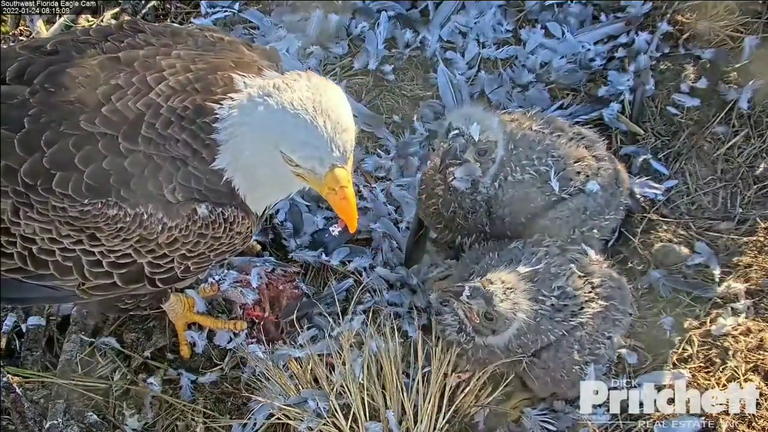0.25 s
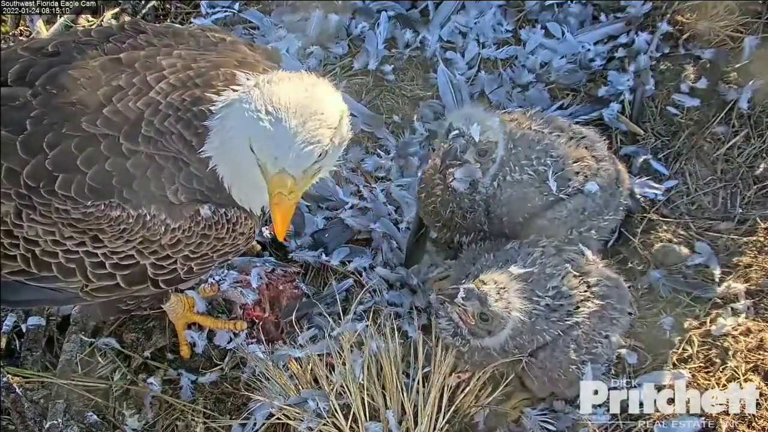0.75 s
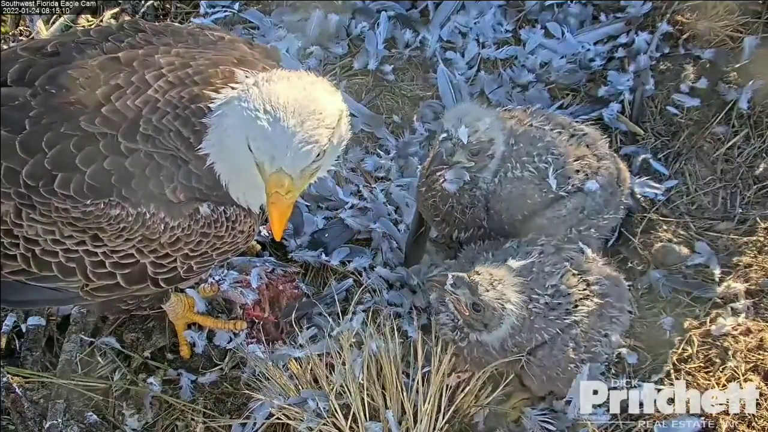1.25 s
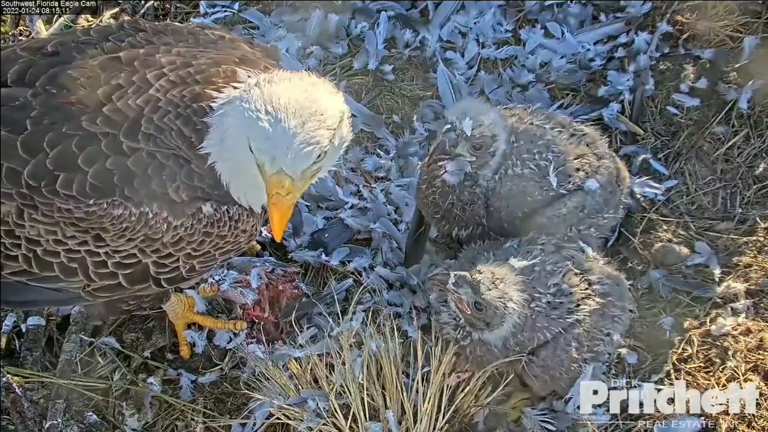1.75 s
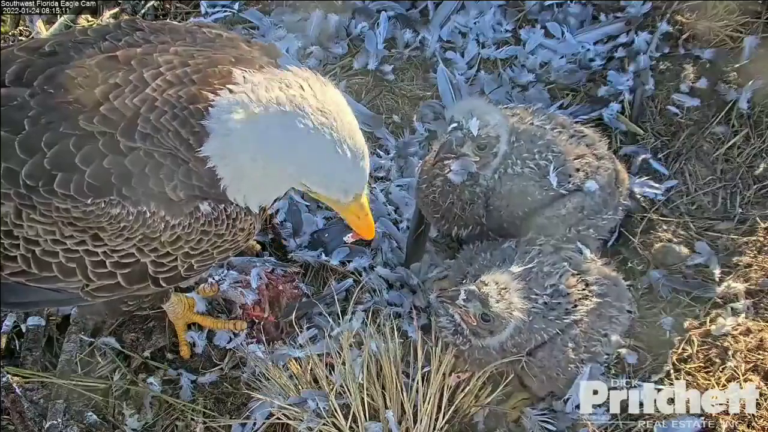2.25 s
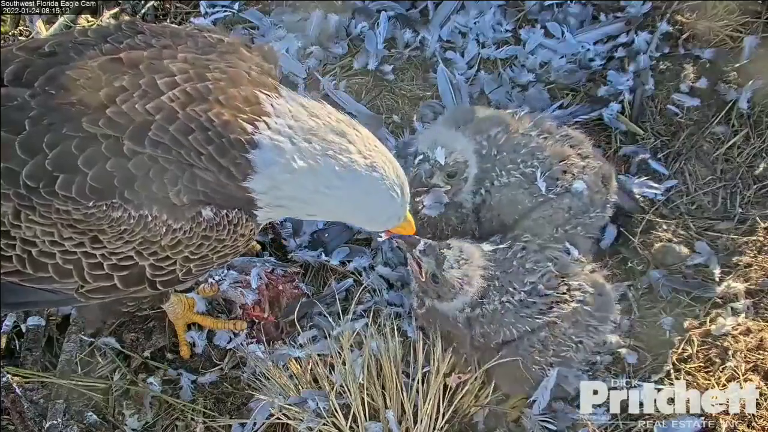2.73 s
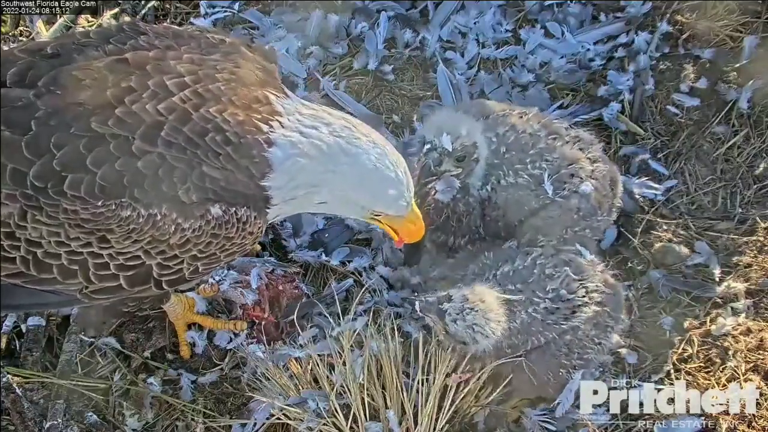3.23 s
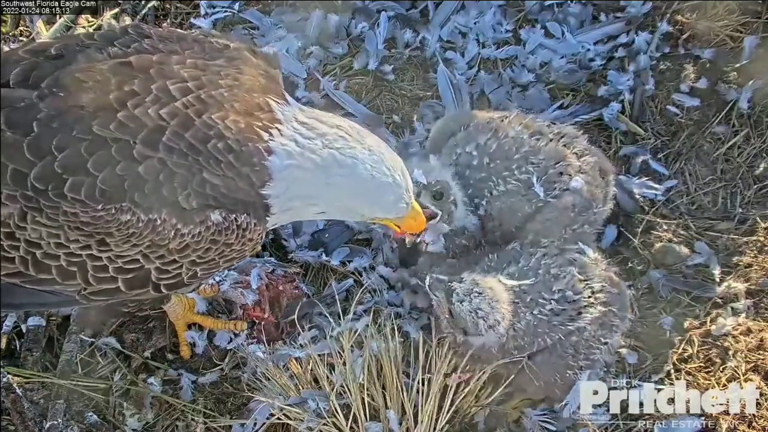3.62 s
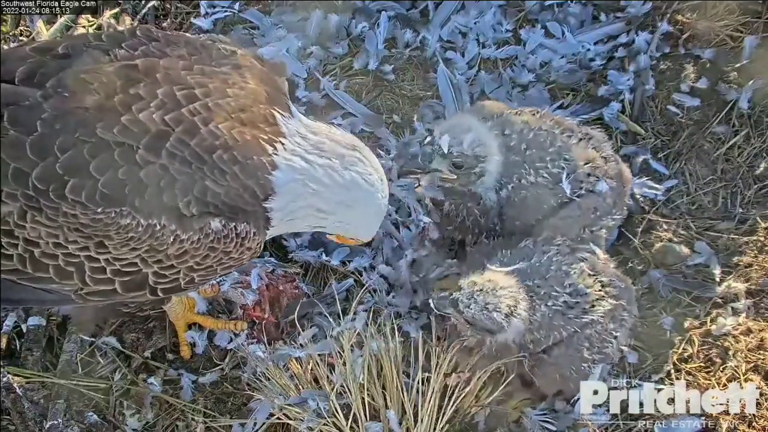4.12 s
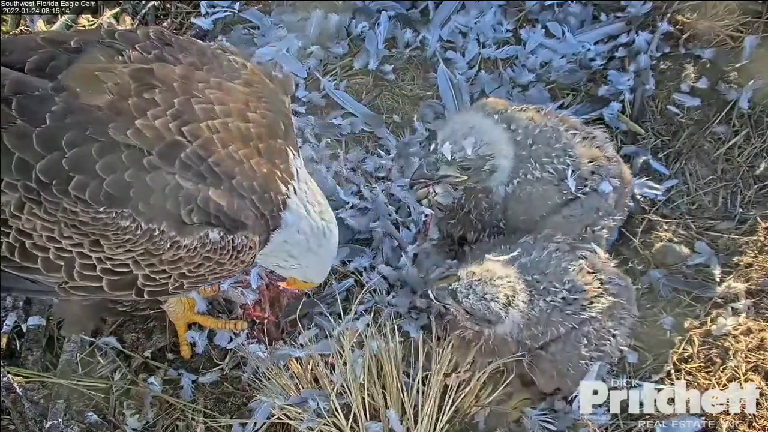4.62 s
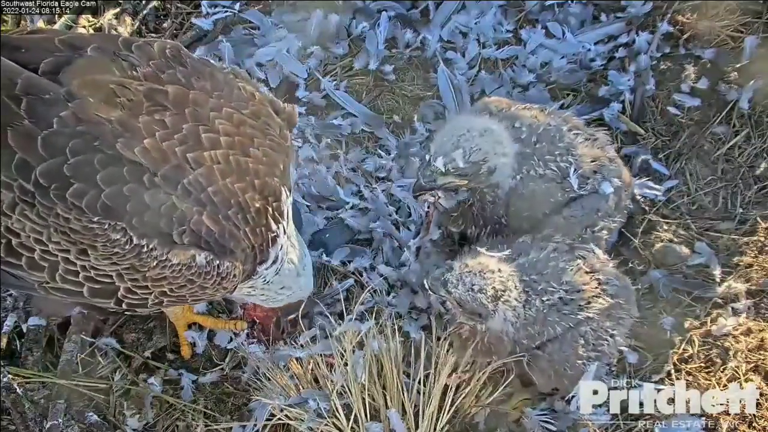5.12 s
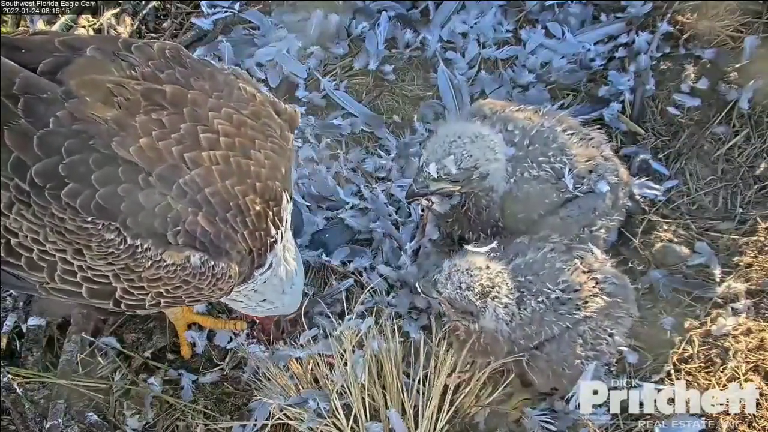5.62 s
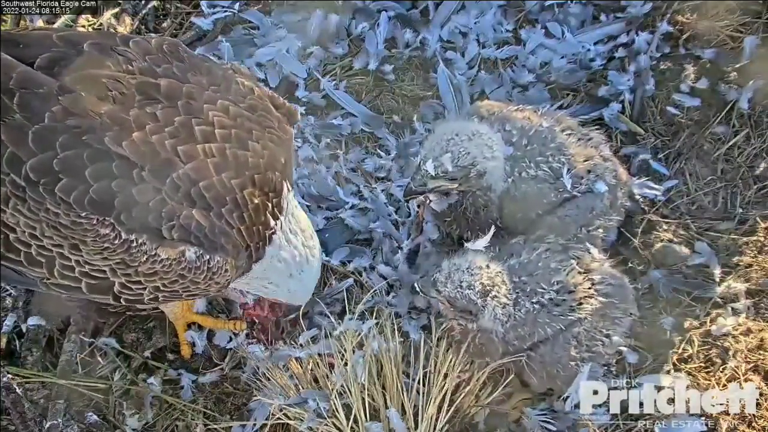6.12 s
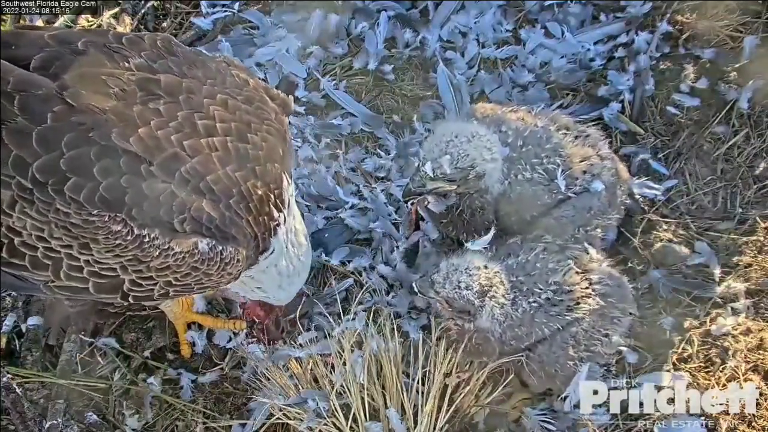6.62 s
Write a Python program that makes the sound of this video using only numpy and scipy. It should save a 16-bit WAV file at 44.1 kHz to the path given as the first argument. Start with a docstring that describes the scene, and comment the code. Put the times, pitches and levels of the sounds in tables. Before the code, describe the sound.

Deep overloaded wind buffeting over distant road hum, while two eaglets give weak high chirps and one brief buzz crackles midway.

```python
"""Wind on the capsule of a treetop-nest microphone: gusting deep noise that drives the input into clipping.
Buffets shake it for a few low cycles, and engines on a road far below add wavering firing notes. Tyre roar, a
shaped noise, comes through only between the flattened peaks; one hears a patchy treble with holes in it. So do
the thin whistles of two chicks, near-sines on pitch curves with an octave. Once the signal stutters in a short
buzz: six quick jumps towards the opposite side."""
import sys
import numpy as np
from scipy import signal
from scipy.fft import rfft, irfft, next_fast_len
from scipy.io import wavfile
from scipy.ndimage import uniform_filter1d

SR = 44100
rng = np.random.default_rng(int(sys.argv[2]) if len(sys.argv) > 2 else 0)


def unload_audio(sound):
    """Save the sound as a 16-bit wav file, at the path given as the first command line argument."""
    columns = np.transpose(np.atleast_2d(sound))
    # keep every value between -1 and 1, then stretch to whole-number steps
    steps = np.round(np.clip(columns, -1, 1) * 32767)
    wavfile.write(sys.argv[1], SR, steps.astype(np.int16))


def ratio_of_db(decibels):
    """Turn decibels (scalar or array-like) into linear amplitude factors; 0 dB maps to 1."""
    return 10 ** (np.asarray(decibels, float) / 20)


N = 302967  # length in samples


def rms_one(x):
    """Scale to unit rms."""
    return x / np.sqrt(np.mean(x ** 2) + 1e-20)


def in_time(rows):
    """Columns of a breakpoint curve, read at every sample."""
    s, *columns = np.transpose(rows)
    return [np.interp(np.arange(N) / SR, s, c) for c in columns]


def gate(rows, fade_s):
    """One while the curve lasts, with soft ends."""
    t = np.arange(N) / SR
    to_nearest_end = np.minimum(t - rows[0][0], rows[-1][0] - t)
    return np.clip(to_nearest_end / fade_s + .5, 0, 1) ** 2


def drift(rate_hz):
    """Slow random modulation with spread 1: noise through a two-pole low-pass, run at every 40th sample."""
    pole = np.exp(-80 * np.pi * rate_hz / SR)
    noise = rng.standard_normal(N // 40 + 2002)
    slow = signal.lfilter([1], [1, -2 * pole, pole * pole], noise)[2000:]
    return np.interp(np.arange(N) / 40, np.arange(len(slow)), rms_one(slow))


def coloured_noise(spectrum, peaks=()):
    """White noise shaped by a spectrum and bell-shaped resonances; rms 1."""
    size = next_fast_len(N)
    hz = np.arange(size // 2 + 1) * SR / size + 1e-3
    corner_hz, corner_db = np.transpose(spectrum)
    db = np.interp(np.log(hz), np.log(corner_hz), corner_db)
    for centre_hz, width_hz, top_db in peaks:
        db = db + top_db / (1 + (2 * (hz - centre_hz) / width_hz) ** 2)
    white = rfft(rng.standard_normal(size))
    return rms_one(irfft(white * ratio_of_db(db), size)[:N])


def tone(hz):
    """A sine of rms 1 on a pitch curve, from a random phase."""
    return np.sqrt(2) * np.sin(2 * np.pi * (np.cumsum(hz) / SR + rng.random()))


# gusts on the capsule: [peak t/s, peak level/dB, length/s]
GUST_PEAKS = [(0, -0.5, 0.16), (0.508, -10.5, .25), (1.163, -10, 0.22), (1.363, -6, .2),
              (2.035, -13.5, 0.23), (2.259, -8.5, .12), (2.774, -5.5, 0.14), (3.03, -7, 0.32),
              (3.59, -1, 0.22), (4.057, -5, 0.45), (4.41, -5.5, .12), (4.571, -4.5, 0.12),
              (4.889, -10.5, .1), (5.451, -9, .35), (6.222, -6.5, 0.12), (6.845, -2, 0.14)]
# colour of the wind, relative: [f/Hz, density level/dB]
WIND_COLOUR = [(5, -3), (12, -2), (30, 2.5), (60, -3.5), (90, -8), (130, -19.5), (220, -30), (400, -70.5),
               (1500, -110), (16000, -170)]
CALM_DB, GUST_RISE_SHARE = -14.5, 0.44  # wind between gusts; share of a gust's length spent rising


def wind(lumpy_db=1.5):
    """Eddies push on the capsule in lumps; each gust swells out of the calm and dies away."""
    t = np.arange(N) / SR
    power = np.full(N, ratio_of_db(CALM_DB) ** 2)
    for s, peak_db, length_s in GUST_PEAKS:
        side_s = length_s * np.where(t < s, GUST_RISE_SHARE, 1 - GUST_RISE_SHARE)
        power += ratio_of_db(peak_db) ** 2 * np.exp(-2 * np.abs(t - s) / side_s)
    lumps = ratio_of_db(lumpy_db * drift(6.0))
    return np.sqrt(power) * lumps * coloured_noise(WIND_COLOUR)


# the lasting engine note: [t/s, f/Hz, level/dB]
ENGINE_NOTE = [(0, 60.2, -13.5), (.55, 58.05, -12), (1, 58.02, -19), (1.5, 58.98, -12.5), (2, 59.19, -21),
               (2.5, 59.85, -15.5), (3.6, 60.3, -9), (4.2, 61.38, -7), (4.8, 62.53, -13.5),
               (5.5, 63.62, -9), (6.3, 63.93, -13), (6.87, 65.12, -16)]
# vehicles that come and go, gliding evenly in pitch: [start t/s, end t/s, first f/Hz, last f/Hz, level/dB]
VEHICLE_PASSES = [(0, 2.92, 77.1, 90.5, -20), (2.5, 3.92, 67, 78.92, -18), (2.5, 3.34, 109.6, 106.6, -23.5),
                  (4, 6.87, 73.35, 84.34, -14.5), (4.499, 7.1, 103, 98.5, -18.5)]


def engines(waver=.006, flutter_db=3.5):
    """Each far engine reaches the nest as its firing note, wavering on the way through moving air."""
    notes = [ENGINE_NOTE]
    for s, end_s, hz, end_hz, db in VEHICLE_PASSES:
        notes.append([(s, hz, db), (end_s, end_hz, db)])
    out = np.zeros(N)
    for rows in notes:
        hz, level_db = in_time(rows)
        note = tone(hz * (1 + waver * drift(3.0)))
        out += gate(rows, 0.38) * ratio_of_db(level_db + flutter_db * drift(3.7)) * note
    return out


# depth of the random holes in the spectrum: [f/Hz, spread level/dB before the cap]
HOLE_DEPTH = [(800, 1.5), (1900, 3.5), (2500, 7), (5000, 9.5), (9000, 7)]
HOLE_TOP = 0.47  # cap: rises stop at this many spreads, dips go deeper


def patchy_treble(sound):
    """Random gains on short narrow cells of the spectrum; one hears a treble with holes in it."""
    hz, _, cells = signal.stft(sound, SR, nperseg=1536)
    # random per cell, averaged over four neighbouring frequencies
    chance = rms_one(uniform_filter1d(rng.standard_normal(cells.shape), size=4, axis=0))
    spread_db = np.interp(hz, *np.transpose(HOLE_DEPTH))[:, None]
    gain = ratio_of_db(spread_db * np.minimum(chance, HOLE_TOP))
    gain /= np.sqrt(np.mean(gain ** 2, axis=1, keepdims=True))  # keeps the colour
    return rms_one(signal.istft(cells * gain, SR, nperseg=1536)[1][:N])


# tyre roar over time: [t/s, level/dB]
ROAR_LEVEL = [(0, -33), (.5, -34.5), (1.8, -31.5), (2.4, -33), (3.3, -30), (4.4, -30.5), (5.6, -29.5),
              (6.87, -31)]
# colour of the roar, relative: [f/Hz, density level/dB]
ROAR_COLOUR = [(120, -13), (250, -5), (500, -5.5), (800, -18), (1250, -17), (1900, -17.5), (2100, -21.5),
               (3000, -30.5), (3600, -31), (4300, -41), (5700, -42.5), (6300, -47), (9400, -49.5),
               (10200, -67), (16000, -64.5)]
# resonances of the microphone housing: [centre f/Hz, width/Hz, boost level/dB]
HOUSING_PEAKS = [(327.2, 62, 14.5), (689.6, 40, 12), (964, 190, 11), (1467, 75, 10.5), (1740, 130, 12.5),
                 (2594, 150, 4)]


def road(uneven_db=0.77):
    """Tyre roar is a broad noise, coloured by the housing and slightly uneven in level."""
    roar = patchy_treble(coloured_noise(ROAR_COLOUR, HOUSING_PEAKS))
    return ratio_of_db(in_time(ROAR_LEVEL)[0] + uneven_db * drift(8.8)) * roar


# one curve per whistle: [t/s, f/Hz, level/dB, octave level/dB]
WHISTLES = [
    [(0, 3980, -63, -72), (.06, 4040, -62, -74), (.09, 4070, -64, -80), (.13, 4020, -66, -85)],
    [(.005, 4270, -66, -85), (.035, 4290, -65, -82), (.06, 4340, -64, -70), (.078, 4380, -70, -80),
     (.1, 4490, -62, -76), (.115, 4600, -55, -66), (.13, 4630, -54, -63), (.155, 4640, -55, -62),
     (.172, 4600, -59, -66), (.19, 4700, -56, -66), (.203, 4810, -55, -68), (.225, 4720, -55, -65),
     (.238, 4700, -53, -67), (.257, 4880, -54, -78), (.285, 4860, -59, -90), (.305, 4860, -66, -90),
     (.325, 4800, -55, -72), (.34, 4620, -56, -74), (.352, 4250, -64, -90), (.365, 3800, -54, -74),
     (.378, 3480, -48, -62), (.39, 2950, -54, -85), (.398, 2560, -46, -64), (.414, 2470, -47, -75)],
    [(.125, 5200, -62, -95), (.16, 5150, -63, -95), (.185, 5140, -63, -95), (.205, 5150, -80, -95),
     (.235, 5200, -63, -95), (.265, 5330, -65, -95), (.285, 5300, -85, -95), (.315, 5200, -80, -95),
     (.328, 5150, -62, -95), (.342, 5150, -82, -95), (.38, 5220, -82, -95), (.398, 5180, -62, -95),
     (.43, 5150, -74, -95)],
    [(.36, 4680, -68, -95), (.41, 4650, -64, -95), (.45, 4620, -66, -95), (.51, 4615, -69, -95),
     (.545, 4580, -72, -95), (.575, 4545, -67, -95), (.6, 4600, -74, -95), (.72, 4600, -80, -95),
     (.75, 4605, -65, -95), (.775, 4600, -72, -95)],
    [(.62, 4220, -66, -95), (.645, 4200, -72, -95), (.665, 4165, -69, -95), (.69, 4230, -64, -95),
     (.72, 4180, -64, -95), (.74, 4200, -71, -95), (.77, 4240, -68, -95)],
    [(.785, 3150, -57, -85), (.805, 3390, -51, -78), (.82, 3450, -58, -74), (.845, 3510, -69, -88),
     (.882, 3560, -59, -85), (.9, 3480, -62, -85), (.928, 3330, -50, -80), (.95, 3230, -59, -85),
     (.962, 3050, -65, -90)],
    [(.811, 3085, -53, -63), (.831, 2760, -47, -63)],
    [(1.5, 3370, -58, -80), (1.515, 3370, -51, -70), (1.534, 3400, -46, -65), (1.552, 3310, -47, -66),
     (1.565, 3270, -49, -80), (1.582, 3300, -48, -85), (1.595, 3400, -57, -76), (1.61, 3490, -59, -67),
     (1.644, 3556, -53, -60), (1.674, 3620, -52, -66), (1.69, 3660, -55, -76), (1.702, 3730, -63, -78),
     (1.722, 3620, -57, -80)],
    [(4.57, 3340, -57, -85), (4.65, 3346, -55, -82), (4.67, 3370, -64, -85), (4.702, 3410, -55, -80),
     (4.74, 3500, -57, -71), (4.796, 3617, -55, -72), (4.825, 3620, -66, -85), (4.876, 3650, -51, -74),
     (4.895, 3690, -53, -68), (4.91, 3770, -63, -65), (4.94, 3865, -63, -65), (4.97, 4010, -61, -62),
     (5.005, 3980, -63, -69), (5.035, 4020, -60, -63), (5.06, 4070, -68, -80), (5.09, 4170, -71, -88),
     (5.12, 4270, -63, -88), (5.145, 4310, -65, -88), (5.17, 4280, -71, -88), (5.205, 4180, -64, -76),
     (5.228, 4000, -71, -80), (5.248, 3860, -66, -78), (5.266, 3670, -57, -75), (5.29, 3560, -72, -88)],
    [(5.385, 5650, -68, -90), (5.41, 5420, -66, -90), (5.43, 5050, -68, -90)],
    [(4.97, 5400, -74, -95), (5.04, 5520, -73, -95), (5.11, 5560, -69, -95), (5.17, 5640, -71, -95),
     (5.23, 5520, -73, -95)],
    [(5.26, 4880, -70, -95), (5.34, 4870, -73, -95), (5.4, 4880, -70, -95), (5.49, 4935, -70, -95)],
    [(5.32, 3280, -64, -88), (5.365, 3335, -58, -88), (5.385, 3600, -70, -85), (5.4, 3720, -63, -78),
     (5.45, 3765, -60, -78), (5.48, 3815, -58, -78), (5.51, 3750, -69, -80), (5.54, 3670, -62, -76),
     (5.57, 3750, -59, -76), (5.6, 3810, -55, -76), (5.635, 3805, -58, -82), (5.66, 3720, -63, -82),
     (5.695, 3755, -61, -88), (5.74, 3730, -65, -88)],
    [(6.01, 3270, -62, -80), (6.035, 3300, -59, -80), (6.062, 3340, -65, -80), (6.085, 3361, -55, -80),
     (6.12, 3385, -60, -76), (6.158, 3442, -54, -73), (6.19, 3490, -57, -85), (6.21, 3505, -66, -88),
     (6.27, 3530, -64, -85), (6.3, 3560, -52, -80), (6.33, 3590, -54, -78), (6.36, 3635, -52, -72),
     (6.388, 3670, -51, -68), (6.41, 3700, -64, -70), (6.44, 3690, -64, -72), (6.48, 3700, -74, -73),
     (6.512, 3765, -57, -67), (6.54, 3810, -60, -72), (6.555, 4000, -70, -80), (6.575, 4200, -63, -88),
     (6.6, 4300, -63, -90), (6.635, 4300, -66, -90), (6.665, 4310, -56, -86), (6.695, 4330, -66, -90),
     (6.71, 4420, -80, -90), (6.726, 4450, -58, -90), (6.742, 4450, -82, -95), (6.765, 4440, -78, -95),
     (6.783, 4440, -60, -90), (6.8, 4460, -66, -90)],
]
FIRM_DB = -55  # whistles softer than this flicker more
FLICKER_DB, FLICKER_GROWTH = 1.8, .13  # level spread when firm; extra dB of spread per dB below firm
GLIDE_ROUGHENS = 1.6  # extra pitch wobble as a share, per squared octave glided in 10 ms


def chicks(waver=.003):
    """Near-sine whistles with an octave; faint breath breaks up pitch and level, fast glides turn rough."""
    out = np.zeros(N)
    for rows in WHISTLES:
        hz, level_db, octave_db = in_time(rows)
        flicker_db = FLICKER_DB + FLICKER_GROWTH * np.maximum(FIRM_DB - level_db, 0)
        glide = np.abs(np.gradient(np.log2(hz))) * SR / 100  # octaves in 10 ms
        wobble = waver * flicker_db / FLICKER_DB + GLIDE_ROUGHENS * glide ** 2
        hz = hz * (1 + wobble * drift(80.0))
        breath = gate(rows, .02) * ratio_of_db(flicker_db * drift(32.0))
        out += breath * (ratio_of_db(level_db) * tone(hz) + ratio_of_db(octave_db) * tone(2 * hz))
    return out


# hard buffets, short bursts of the capsule's low flutter: [centre t/s, level/dB, length/s]
BUFFET_HITS = [(0.406, -12, 0.061), (0.552, -8, 0.05), (0.703, -8.5, 0.037), (1.443, -3.5, 0.058),
               (1.592, -7, .06), (2.542, -6.5, .07), (2.91, -1.5, 0.066), (3.048, -6.5, 0.064),
               (3.242, -4.5, 0.1), (3.509, -4, 0.055), (4.188, -8.5, 0.087), (4.349, -2.5, 0.083),
               (4.508, -4, 0.1), (4.836, -4.5, 0.13), (5.818, -3, 0.06), (6.213, -9.5, 0.05),
               (6.463, -4.5, 0.082)]
BUFFET_HZ, BUFFET_WIDTH_HZ = 54.52, 45


def buffets():
    """A hard eddy shakes the capsule unevenly for a few cycles, swelling and fading."""
    t, swell = np.arange(N) / SR, np.zeros(N)
    for s, level_db, length_s in BUFFET_HITS:
        swell += ratio_of_db(level_db) * np.exp(-(2 * (t - s) / length_s) ** 2)
    edges = [BUFFET_HZ - BUFFET_WIDTH_HZ / 2, BUFFET_HZ + BUFFET_WIDTH_HZ / 2]
    band = signal.butter(2, edges, "band", fs=SR, output="sos")
    shake = signal.sosfilt(band, rng.standard_normal(N))
    # evened to rms 1 over 2000 samples
    return swell * shake / np.sqrt(uniform_filter1d(shake ** 2, size=2000) + 1e-12)


OVERLOAD = .705  # clipping ceiling, full scale 1
# brief jumps towards the opposite side, one a period: [jump level/dB before the low-pass and clipping]
STUTTER_JUMPS = [-13, -2, -14, 1, -4, -20]
STUTTER_START_S, STUTTER_PERIOD_S = 4.4963, .00533
STUTTER_S, STUTTER_RIPPLE_HZ = .00056, 8500  # length of one jump and its ripple


def stutter(x, ripple=0.24, half_ripple=0.1, rough=.07, sag=.06, edge_hz=10500, hiss_db=-36, hiss_hz=9000):
    """Each period the signal jumps from its side for half a millisecond, rippling and crackling, over hiss."""
    jumps, width = np.zeros_like(x), round(STUTTER_S * SR)
    turn = 2 * np.pi * STUTTER_RIPPLE_HZ * (np.arange(width) - (width - 1) / 2) / SR
    shape = 1 + ripple * np.cos(turn) + half_ripple * np.cos(turn / 2)
    grit = rng.standard_normal((len(STUTTER_JUMPS), width))
    for k, jump_db in enumerate(STUTTER_JUMPS):
        at = round((STUTTER_START_S + k * STUTTER_PERIOD_S) * SR)
        away = -np.sign(x[:, at:at + 1])
        tilt = sag * grit[k, 0] * np.linspace(-1, 1, width)
        jumps[:, at:at + width] = away * ratio_of_db(jump_db) * (shape + rough * grit[k] + tilt)
    # hiss runs over the first four periods, wherever the signal is not clipped
    periods = (np.arange(N) / SR - STUTTER_START_S) / STUTTER_PERIOD_S
    hissing = (periods > 0) * (periods < len(STUTTER_JUMPS) - 2) * (np.abs(x) < OVERLOAD)
    hiss_filter = signal.butter(4, hiss_hz, fs=SR, output="sos")
    hiss = ratio_of_db(hiss_db) * signal.sosfilt(hiss_filter, rng.standard_normal(N))
    edge_filter = signal.butter(1, edge_hz, fs=SR, output="sos")
    return x + hiss * hissing + signal.sosfilt(edge_filter, jumps)


def scene():
    """Everything in the sound ahead of the input stage."""
    return (wind() + engines() + road() + chicks() + buffets())[None]


INPUT_GAIN_DB, INPUT_TOP_HZ = 2.5, 13300


def roll_off(x):
    """The treble ends steeply here."""
    return signal.sosfilt(signal.butter(12, 16600, fs=SR, output="sos"), x)


def record(dry):
    """The input stage clips hard, the signal stutters and clips again, the treble rolls off."""
    overloaded = np.clip(ratio_of_db(INPUT_GAIN_DB) * dry, -OVERLOAD, OVERLOAD)
    clipped = np.clip(stutter(overloaded), -OVERLOAD, OVERLOAD)
    rolled = signal.sosfilt(signal.butter(2, INPUT_TOP_HZ, fs=SR, output="sos"), clipped)
    return roll_off(rolled)


dry = scene()
out = record(dry)
unload_audio(out)
```